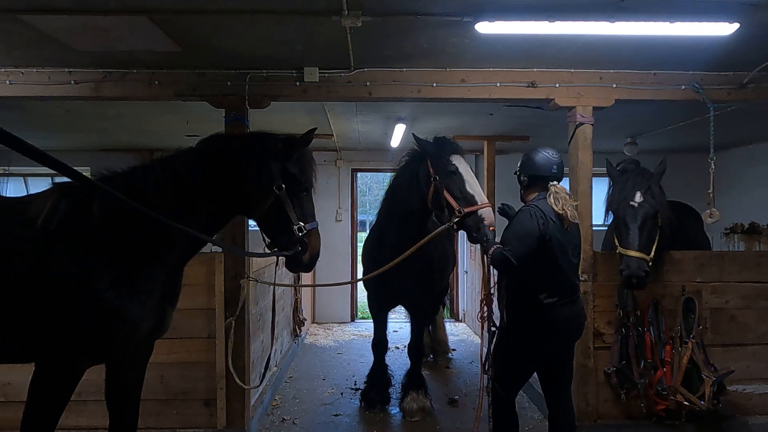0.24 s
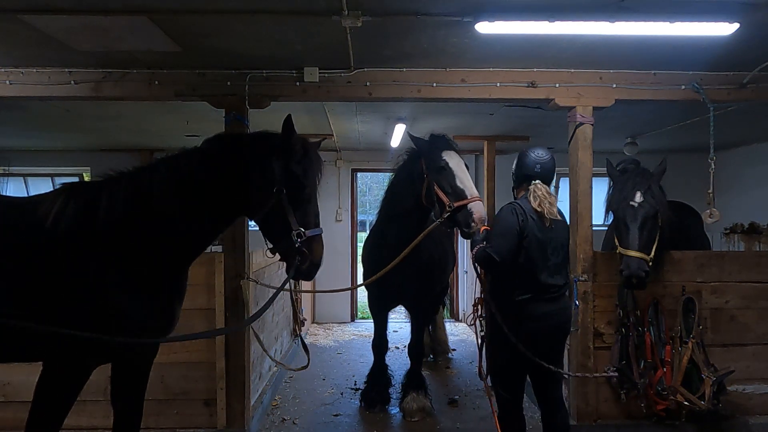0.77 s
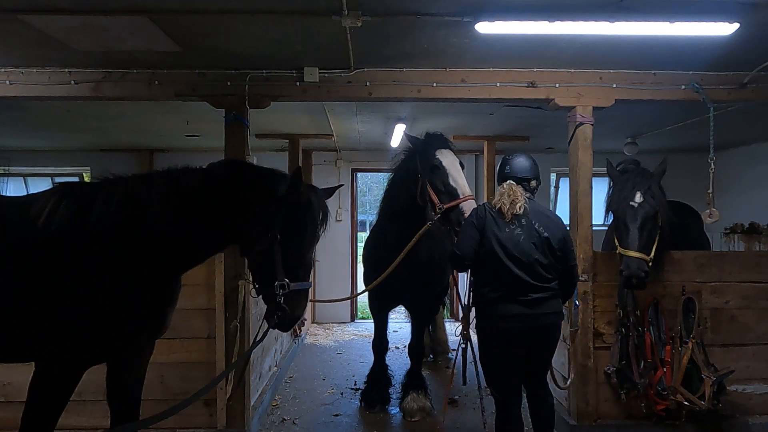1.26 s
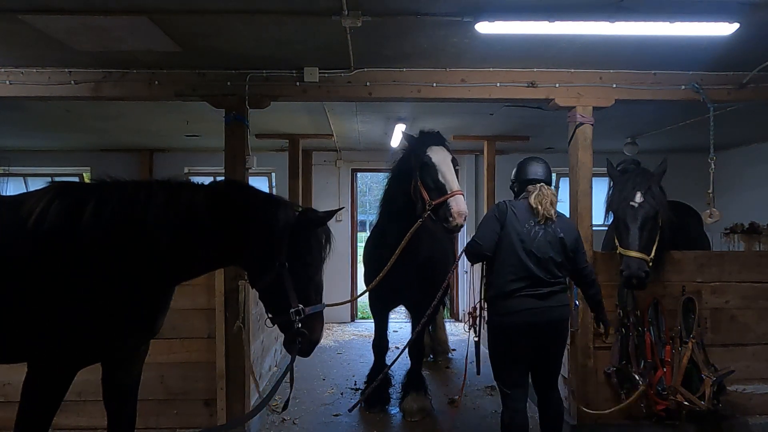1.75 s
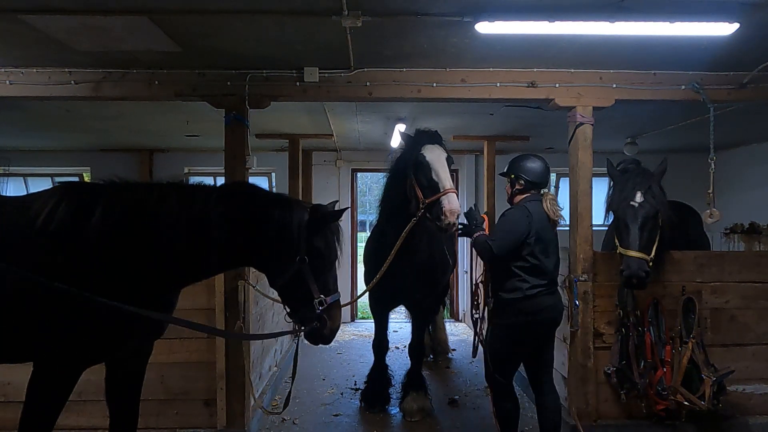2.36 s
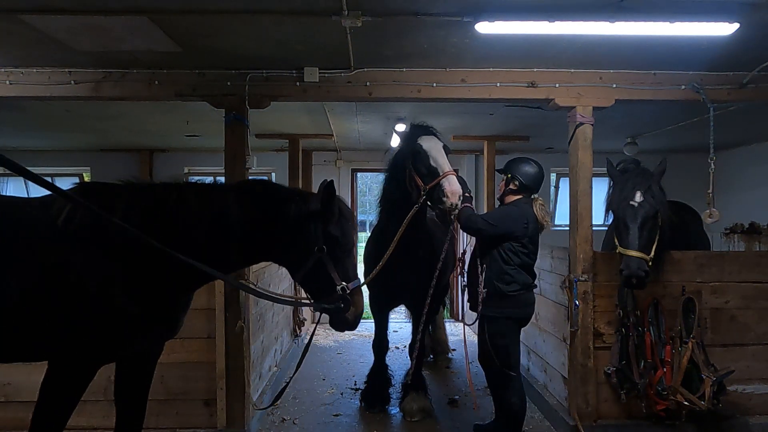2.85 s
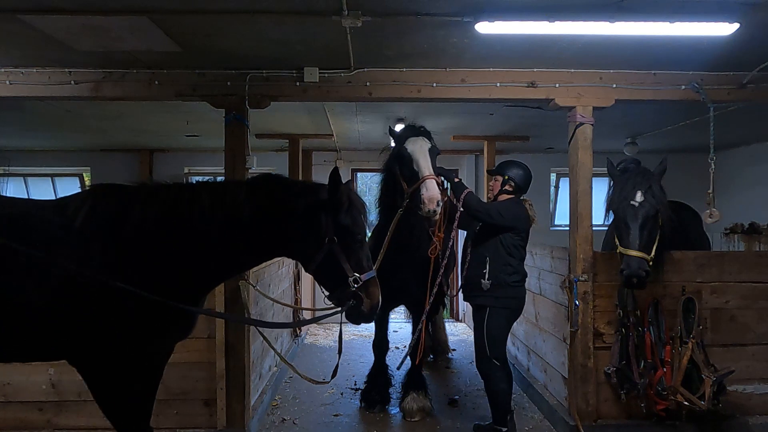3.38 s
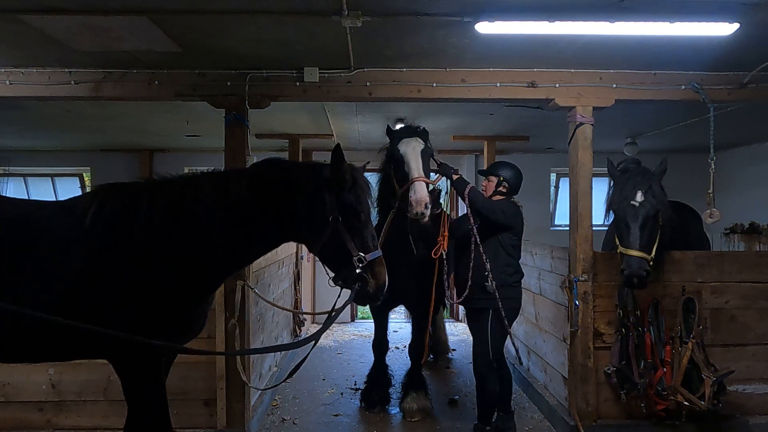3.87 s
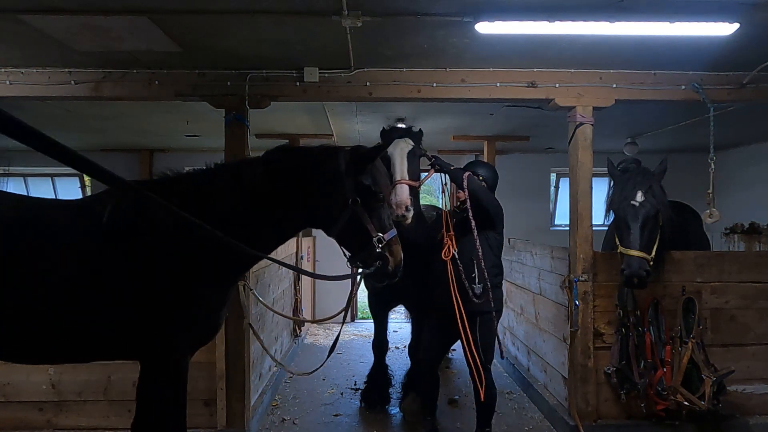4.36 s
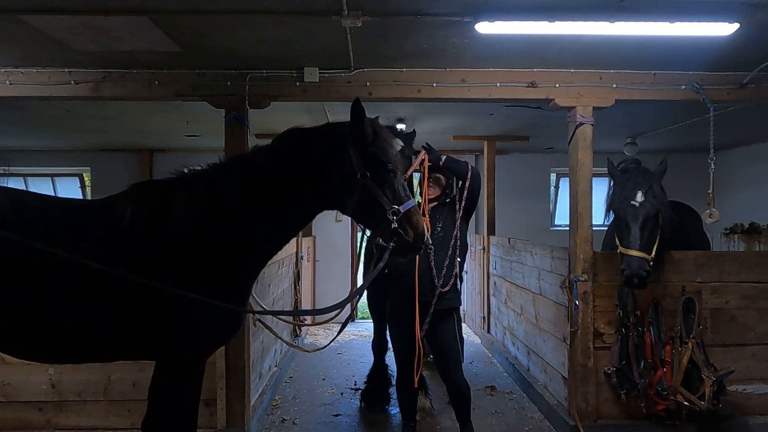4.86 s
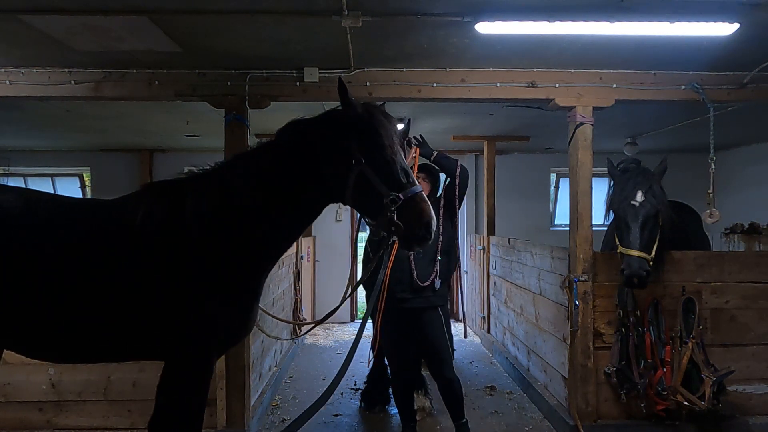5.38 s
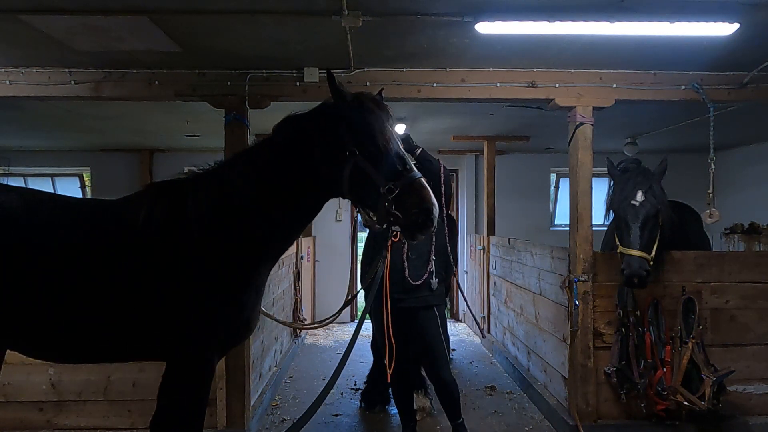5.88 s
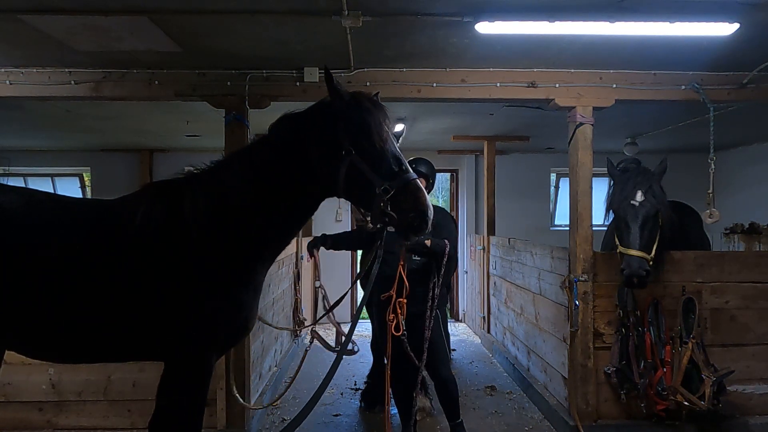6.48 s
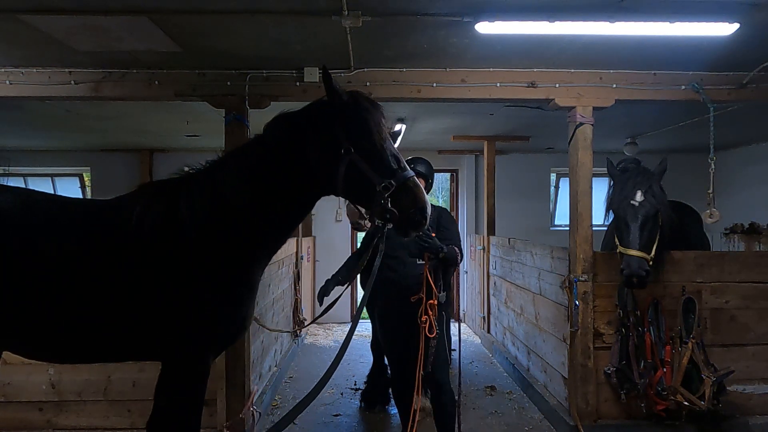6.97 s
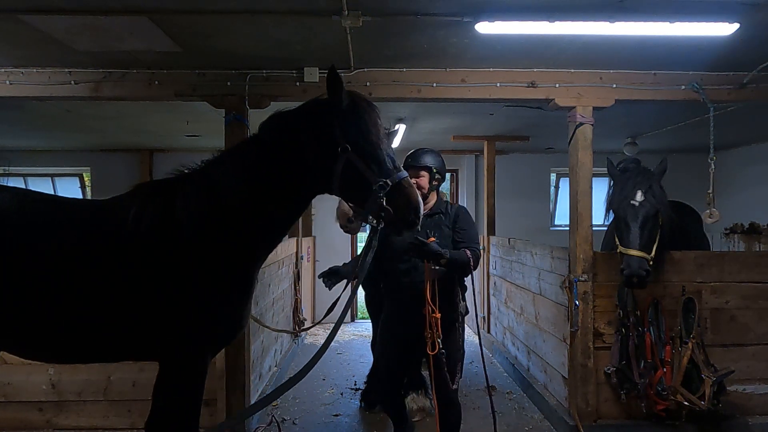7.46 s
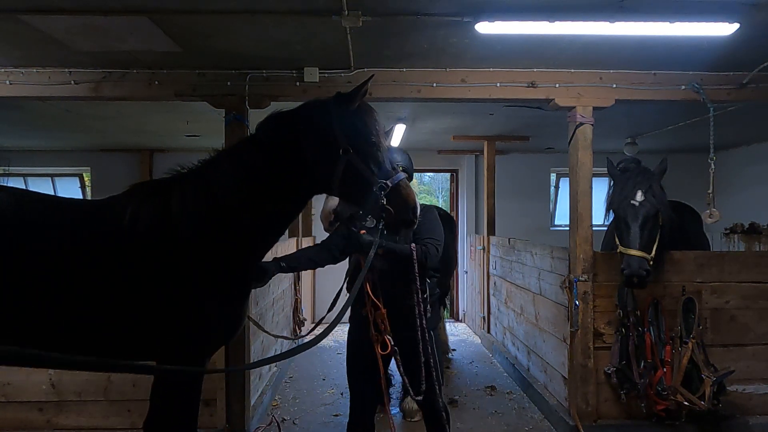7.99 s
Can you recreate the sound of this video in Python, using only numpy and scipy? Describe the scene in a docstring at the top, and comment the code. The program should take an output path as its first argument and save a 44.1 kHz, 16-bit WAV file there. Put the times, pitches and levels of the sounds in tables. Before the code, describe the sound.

Leather and rope rub softly while hooves make low thuds and short woody knocks, answered by a brief low-room echo. Grit and buckles tick brightly between them. Loose metal cracks on wood around two seconds, a cluster of hoof steps follows near four, and after a quieter stretch the loudest knock and a metallic rattle land just past seven seconds. Close-to-mid stereo perspective, with a quiet airy background.

```python
"""A timber stable aisle, where horses shift about a few metres away.
Hooves thud and knock as sums of decaying modes; ropes, straps and dragged hooves rustle as shaped noise.
Buckles and grit tick in short noise bursts, metal rings on paired modes or chatters on wood.
Faint fuzzy tones, some creak-like and some ringing on after a knock, are sines of wandering pitch and level.
Sparse decaying echoes of the low room answer every blow."""
import sys
import numpy as np
from scipy import signal
from scipy.fft import rfft, irfft, next_fast_len
from scipy.io import wavfile
from scipy.ndimage import uniform_filter1d

SR = 44100
rng = np.random.default_rng(int(sys.argv[2]) if len(sys.argv) > 2 else 0)


def int16_out(signal):
    """Quantize to a 16-bit WAV file."""
    q = np.round(np.clip(np.atleast_2d(signal).T, -1, 1) * 32767)
    wavfile.write(sys.argv[1], SR, q.astype(np.int16))


N = 362943

# Likeness of the left and right sound fields. Each row: frequency in Hz, correlation from 0 to 1.
LIKENESS = [(60, 1), (200, 0.9255), (700, 0.733), (3000, 0.726), (12000, 0.83)]


def amp(db):
    """Decibels are logarithmic: 20 dB is a tenfold gain."""
    return 10 ** (np.asarray(db) / 20)


def evened(x):
    """Root-mean-square normalization: scales a signal to unit rms."""
    return x / np.sqrt(np.mean(x ** 2) + 1e-20)


def read(points, hz):
    """Linear interpolation of a table along a logarithmic frequency axis."""
    f, value = np.transpose(points)
    return np.interp(np.log(hz + 1), np.log(f + 1), value)


def add(mix, s, sound, pan_db=0.):
    """Superposition: adds a sound at s seconds, with a level difference of pan_db toward the left."""
    part = mix[:, round(s * SR):][:, :len(sound)]
    side_gain = amp([[pan_db / 2], [-pan_db / 2]])
    part += side_gain * sound[:part.shape[1]]


def grid(size):
    """Short-time analysis: times and frequencies of frames that overlap by three quarters."""
    t = np.arange(N * 4 // size + 5) * size / 4 / SR
    return t, np.fft.rfftfreq(size, 1 / SR)


def correlated(left, other, hz):
    """Partial coherence: the right channel mixes the left with an independent spectrum."""
    same = np.clip(read(LIKENESS, hz), -1, 1)[:, None]
    return np.array([left, same * left + np.sqrt(1 - same ** 2) * other])


def noise(db, size, patchy_db):
    """Filtered Gaussian noise: a level field over frequency and time, with drifting patches."""
    hz = np.fft.rfftfreq(size, 1 / SR)
    a, b, c, d, patches = rng.standard_normal((db.shape[1], len(hz), 5)).T
    patches = uniform_filter1d(patches, size=6, axis=0)  # smooth over frequency, then over time
    patches = evened(uniform_filter1d(patches, size=10240 // size, axis=1))
    z = correlated(a + 1j * b, c + 1j * d, hz)
    z = z * amp(db + patchy_db * patches)
    return signal.istft(z, nperseg=size, noverlap=size * 3 // 4)[1][:, :N]


def struck(modes, rise_s, rough=0., grip_s=0.005):
    """Modal synthesis: a blow excites damped sines, shaken by loose contact, scaled to peak 1."""
    hz, db, t60 = np.transpose(modes)[:, :, None]
    t = np.arange(0, t60.max(), 1 / SR)
    luck = rng.standard_normal((2, len(hz), 1))  # mode levels and phases differ from blow to blow
    decay = np.exp(-np.log(1000) * t / t60)
    rings = decay * np.sin(2 * np.pi * (hz * t + luck[1]))
    shake = rng.standard_normal((len(hz), len(t)))
    shake = uniform_filter1d(shake, int(grip_s * SR) + 1, axis=1)
    rings = rings * (1 + rough * evened(shake))
    rise = 1 - np.exp(-(t / rise_s) ** 2)
    ring = (amp(db + 2 * luck[0]) * rings).sum(0) * rise
    return ring / abs(ring).max()


def planks(low_hz, high_hz, t60, tilt_db, count):
    """Modal density: timber has many close, short modes, tilted by tilt_db an octave, weak at the top."""
    return [(f, tilt_db * np.log2(f / low_hz) - 12 * (f / high_hz) ** 4, t60)
            for f in np.geomspace(low_hz, high_hz, count)]


def burst(colour, rise_s, t60, grain_db):
    """Transient noise: coloured hiss in uneven grains under a quick rise and exponential decay."""
    t60 = min(t60, .45)
    size = 400 * int(t60 * SR / 400 + 4)
    t, hz = np.arange(size) / SR, np.fft.rfftfreq(size, 1 / SR)
    white = rng.standard_normal(SR // 2)[:size]
    hiss = irfft(rfft(white) * amp(read(colour, hz)))
    grains = np.repeat(amp(grain_db * rng.standard_normal(SR // 100)), 50)[:size]
    shape = amp(-60 * t / t60) * np.minimum(t / rise_s, 1) ** 2
    grainy = uniform_filter1d(grains, size=30) * hiss * shape
    return evened(grainy) * np.sqrt(np.mean(shape ** 2))


def air():
    """Stationary noise: a steady room tone of fixed average spectrum."""
    # Each row: frequency in Hz, relative spectral level in dB.
    air_colour = [(24, 5), (60, 9.5), (100, -49), (139, 7.5), (174, 1.5), (838, -17), (1350, 0.5),
                  (4920, -6.5), (11800, -53), (15500, -83.5)]
    t, hz = grid(size=2048)
    field = read(air_colour, hz)[:, None] + 0 * t
    return amp(-56) * evened(noise(field, size=2048, patchy_db=5.0))


def strokes(t):
    """Energy addition: strokes swell and fade at constant dB rates, and their powers sum."""
    # Sliding ropes and straps, dragging hooves. Each row: crest in seconds, rustle level in dB,
    # low shuffle level in dB, swell in seconds, fade in seconds (each time spans drop_at_ends_db).
    stroke_rows = [(0.068, -35, -43, 0.296, 0.141), (.62, -47, -44.5, 0.071, 0.176),
                   (.97, -77, -52, 0.62, 0.72), (1.299, -40.5, -55, 0.384, 0.152),
                   (1.46, -47, -40, 0.097, 0.17), (1.62, -45, -46, 0.14, 0.392),
                   (2.45, -46, -41, 0.283, 0.443), (2.7, -48, -63.5, 0.712, 0.39),
                   (2.98, -39.5, -43, 0.026, 0.225), (3.471, -39.5, -49.5, 0.18, 0.276),
                   (3.931, -36.5, -34, 0.0966, 0.1596), (4.2, -49.5, -49.5, 0.27, 0.28),
                   (4.4, -39.5, -48, 0.171, 0.0425), (4.63, -44, -48, 0.205, 0.54),
                   (4.96, -31.5, -43.5, 0.1134, 0.2098), (5.7, -46, -47.5, 0.244, 1),
                   (6.1, -41.5, -73.5, 0.184, 0.29), (6.62, -46, -44.5, 0.284, 0.42),
                   (7.05, -39.5, -43.5, 0.189, 0.57), (7.45, -66, -37.5, 0.505, 0.1025),
                   (7.9, -48, -56.5, 0.36, 0.082)]
    drop_at_ends_db = 15
    s, level_db, low_db, swell_s, fade_s = np.transpose(stroke_rows)[:, :, None]
    drop_db = drop_at_ends_db * np.maximum((s - t) / swell_s, (t - s) / fade_s)
    levels = []
    for db, stir_db in ((level_db, -58), (low_db, -79.5)):  # faint stirring between the strokes
        power = amp(2 * stir_db) + amp(2 * (db - drop_db)).sum(0)
        levels.append(10 * np.log10(power))
    return levels


def rustle():
    """Friction noise: fibres slip in clumps, heavier dragging is duller, weight shifts shuffle low."""
    # Colours of the rubbing fibres and of the shuffle.
    # Each row: frequency in Hz, relative spectral level in dB.
    fibre_colour = [(290, -36.5), (500, -29.5), (1150, 0.5), (2500, -2.5), (3430, -3), (5280, -6.5),
                    (12100, -32.5), (14800, -45.5)]
    shuffle_colour = [(35, -37), (112, -51), (139, -3.5), (193, 3.5), (368, -6), (451, -7), (900, -19),
                      (1170, -51.5), (1980, -120)]
    dull_hz, dull_per_db, dull_from_db = 3475, .5, -38  # treble loss per octave and dB of stroke level
    rasp_hz, rasp_octaves = 2845, 0.13  # a resonance that grows with the stroke
    rasp_per_db, rasp_from_db = 0.16, -49
    t, hz = grid(size=512)
    level_db, low_db = strokes(t)
    slips_db = 1.42 * np.minimum(rng.exponential(1, len(t)), 4)
    treble = np.clip(np.log2(hz / dull_hz + 1e-9), 0, 1.2)[:, None]  # octaves above dull_hz
    fibres = read(fibre_colour, hz)[:, None] - treble * dull_per_db * (level_db - dull_from_db)
    rasp = np.exp(-(np.log2(hz / rasp_hz + 1e-9) / rasp_octaves) ** 2)[:, None]
    fibres = fibres + rasp * rasp_per_db * (level_db - rasp_from_db)
    fibres = fibres - 10 * np.log10(amp(2 * fibres).sum(0))  # equal power in every frame
    rub = evened(noise(fibres + slips_db, size=512, patchy_db=2.0))
    frames, hz = grid(size=2048)
    shuffle_field = read(shuffle_colour, hz)[:, None] + 0 * frames
    weight = evened(noise(shuffle_field, size=2048, patchy_db=5.0))
    now = np.arange(N) / SR
    return amp(np.interp(now, t, level_db)) * rub + amp(np.interp(now, t, low_db)) * weight


def hooves():
    """Modal excitation: each blow shares its force between slow boom, body and quick floor knock."""
    # Hooves and dropped tack. Each row: start in seconds, boom, body and knock peak levels in dB,
    # boom frequency of that spot in Hz, knock tilt in dB per octave.
    thud_rows = [(0.036, -81.5, -50, -29, 85, 2.5), (0.574, -84, -64.5, -37, 87, 4),
                 (1.433, -43.5, -39, -23, 80.4, 3), (1.607, -47, -35, -25.5, 87.2, -4),
                 (1.675, -48, -33.5, -40, 71.1, -2), (2.148, -23, -23.5, -50, 75.67, 4),
                 (2.424, -75, -43.5, -35.5, 89.7, -4), (2.459, -77, -30, -35.5, 91, -7),
                 (2.6, -33.5, -62.5, -32.5, 74.9, 8.5), (2.947, -81, -35.5, -40, 67, 5.5),
                 (3.843, -37, -31, -56, 87.5, -0.5), (3.915, -30, -25.5, -32, 79.5, 4),
                 (4.32, -27, -26.5, -25.5, 78.17, 1.5), (4.347, -25, -21, -17, 82, 2),
                 (4.658, -46, -24.5, -29, 94.9, 0), (5.0, -75.5, -51.5, -32, 80, -2),
                 (6.624, -37.5, -56.5, -67, 93.9, -2.5), (6.698, -43.5, -37, -41.5, 88.7, -0.5),
                 (7.033, -60, -29.5, -20.5, 70, -1.5), (7.054, -28.5, -19, -4.5, 70.9, -1),
                 (7.151, -21, -18.5, -35, 68.96, -7.5), (7.24, -24, -26, -41, 68.7, -2.5),
                 (7.954, -62.5, -38.5, -35.5, 67, 1), (8.048, -81, -36.5, -38, 67.9, 0.5)]
    # Hoof wall and boards ringing on after a knock.
    # Each row: mean frequency in Hz, relative level in dB, 60 dB decay time in seconds.
    hoof_modes = [(390, 4, .18), (630, 6, .13), (770, 0, .1), (940, 0, .1), (1130, 0, .13), (1260, -2, .16),
                  (1440, 1, .1), (1760, -4, .1)]
    pair = 1.18  # frequency ratio of neighbouring boom modes
    out, body = np.zeros((2, N)), planks(120.16, 452.37, 0.18, -0.18, count=16)
    knock = planks(380, 2700, 0.08, -2, count=30) + hoof_modes
    for s, boom_db, body_db, knock_db, boom_hz, tilt_db in thud_rows:
        boom = [(boom_hz, 0, .22), (boom_hz * pair, -2, .2), (boom_hz * pair ** 2, -5, .2)]
        add(out, s, amp(boom_db) * struck(boom, rise_s=0.0335, rough=.25, grip_s=0.049))
        add(out, s, amp(body_db) * struck(body, rise_s=0.00516, rough=0.299, grip_s=0.033))
        tilted = [(hz * rng.normal(1, .03), db + tilt_db * np.log2(hz), t60) for hz, db, t60 in knock]
        add(out, s, amp(knock_db) * struck(tilted, rise_s=0.004, rough=.7, grip_s=.012))
    return out


def ticks():
    """Impulsive noise: grit, buckles and strap ends tick, each with its own brightness and side."""
    # Each row: start in seconds, level in dB around 1-3 kHz, relative level in dB around 3-7 kHz.
    tick_rows = [(0.053, -25.5, -13), (.11, -26, -23), (1.281, -40, -1), (1.433, -36.5, 1),
                 (1.603, -33.5, -1.5), (1.665, -24, -3), (1.8285, -33.5, -7), (2.609, -27, -11.5),
                 (3.0591, -40.5, 0.5), (3.466, -34, -4), (3.499, -35, -5), (3.9682, -23, 2),
                 (4.3228, -42, 6.5), (4.347, -29, -2), (4.641, -29, -6.5), (4.8387, -30, 1),
                 (4.961, -21, -9), (4.967, -18.5, -11), (5.0112, -14, -8), (5.093, -26, -23.5),
                 (5.6925, -37.5, -10), (5.87, -40.5, 2), (6.342, -33, -2.5), (6.4252, -37.5, 2),
                 (6.6962, -30, 0.5), (6.9609, -30, -5.5), (7.018, -25, -3), (7.117, -19, -13),
                 (7.933, -32.5, -9), (7.9832, -37.5, -5), (8.0566, -34, -10.5), (8.205, -32, -7.5)]
    out = np.zeros((2, N))
    for s, low_db, mid_db in tick_rows:
        high_db = -6 + 1.7 * mid_db  # above 7 kHz the level follows the brightness
        colour = [(500, -35.5), (1100, -0.5), (1900, -1.0), (3000, -1.5), (4500, mid_db + 1.5),
                  (6500, mid_db - 4.5), (9500, high_db - 8.5), (15000, high_db - 17)]
        total_db = 10 * np.log10(1 + amp(2 * mid_db) + amp(2 * high_db))  # band powers add
        tick = burst(colour, rise_s=0.00198, t60=0.03755, grain_db=4.0)
        add(out, s, amp(low_db + total_db) * tick, pan_db=1.33 + 1.5 * rng.standard_normal())
    return out


def clinks():
    """Beating mode pairs: a thin ring clinks and a heavy snap hook rattles down."""
    # Modes of the thin ring and of the snap hook.
    # Each row: frequency in Hz, relative level in dB, 60 dB decay time in seconds.
    ring_modes = [(4980, -1, 0.2), (6214, 3, 0.45), (8003, 0.5, 0.291), (9570, -8, 0.1), (10510, -2, 0.25),
                  (12100, -13.5, 0.14), (13010, -15.5, 0.27), (14600, -17, 0.16)]
    snap_modes = [(4939, 13, 0.06), (5130, 11, 0.05), (4968, -2, 0.36), (5166, 11, 0.06), (7750, -4, 0.047),
                  (8356, -2, 0.04), (9060, 1.5, 0.0603), (13330, -20.5, 0.16)]
    # Blows on each. Each row: start in seconds, level in dB before the jangle.
    ring_blows = [(1.072, -31), (1.108, -22), (6.343, -41.5)]
    snap_blows = [(7.152, -20), (7.162, -7), (7.168, -4), (7.194, -12)]
    out = np.zeros((2, N))
    for modes, blows, rough in ((ring_modes, ring_blows, .3), (snap_modes, snap_blows, .65)):
        paired = modes + [(hz * 1.008, db, t60) for hz, db, t60 in modes]  # close twins beat
        for s, db in blows:
            ring = struck(paired, rise_s=0.0003, rough=rough)
            jangle = rng.standard_normal(SR)[:len(ring)]
            jangle = evened(uniform_filter1d(jangle, size=300))  # loose parts touch and damp it
            add(out, s, amp(db + 2.8 * jangle) * ring, pan_db=2.0)
    return out


def chatter():
    """Resonant filtering: loose fittings crack and chatter on wood as noise through broad resonances."""
    # Colour of the fittings on wood. Each row: frequency in Hz, relative spectral level in dB.
    latch_colour = [(240, -19.5), (450, -13.5), (860, -17), (1100, -12.5), (2500, -10), (5000, -10),
                    (8900, -13.5), (13900, -20.5), (15500, -47)]
    # Their resonances. Each row: frequency in Hz, width in Hz, boost in dB at full share.
    latch_rings = [(2200, 1600, -9), (3570, 300, 13), (4350, 300, 11), (6150, 600, 13), (12000, 6000, -4)]
    # Each row: start in seconds, level in dB before the envelope, rise in seconds,
    # 60 dB decay time in seconds (capped in burst), share of the resonances from 0 to 1.
    chatter_rows = [(1.057, -17, 0.0216, 0.115, 0.27), (1.108, -29.5, 0.0052, 0.134, 0.81),
                    (2.146, -1.5, 0.00333, 0.0223, 0.8), (2.152, -19.5, 0.0247, 1, 0.64),
                    (2.199, -23, 0.0053, 0.44, 0.93), (2.947, -41.5, 0.0045, 0.448, 0.93),
                    (7.034, -19, 0.0257, 0.0795, 0.56), (7.0958, -11, 0.000525, 0.0242, 0.31),
                    (7.098, -26, 0.00264, 0.116, 0.2), (7.149, -14.5, 0.00547, 0.23, 0.28)]
    out = np.zeros((2, N))
    hz = np.geomspace(200, 16000, 300)
    rings_db = sum(db / (1 + (2 * (hz - f) / width) ** 2) for f, width, db in latch_rings)
    for s, db, rise_s, t60, share in chatter_rows:
        colour = np.transpose([hz, read(latch_colour, hz) + share * rings_db])
        add(out, s, amp(db) * burst(colour, rise_s, t60, grain_db=4.2), pan_db=1.5)
    return out


def faint_tones():
    """Random modulation: wandering level and pitch smear each tone, which crests early and dies away."""
    # Faint fuzzy tones, some creak-like, some ringing on after a knock. Each row: start in seconds,
    # length in seconds, mean frequency in Hz, crest level in dB before the level wanders.
    tone_rows = [(1.66, 0.2, 1805, -44), (3.195, 0.185, 1909, -50.5), (3.767, 0.4, 1810, -51.5),
                 (5.187, 0.24, 1890, -54.5), (5.8, 0.415, 3536, -49.5), (4.4, 0.199, 1301, -43),
                 (6.08, 0.144, 1466, -50.5)]
    out = np.zeros((2, N))
    for s, length_s, hz, db in tone_rows:
        t = np.arange(0, length_s, 1 / SR)
        level_wander, pitch_wander = (
            evened(uniform_filter1d(rng.standard_normal(SR)[:len(t)], size=size)) for size in (250, 900))
        turns = np.cumsum(hz * (1 + .012 * pitch_wander)) / SR
        swell = np.sin(np.pi * np.sqrt(t / length_s)) ** 2
        add(out, s, amp(db) * (1 + .6 * level_wander) * np.sin(2 * np.pi * turns) * swell)
    return out


def room(x):
    """Reverberation: sparse taps of random sign, each band decaying at its own rate, bass alike in both."""
    # Each row: frequency in Hz, 60 dB decay time in seconds.
    reverb_times = [(60, 0.359), (250, 0.681), (1000, 0.662), (3000, 0.3555), (7000, 0.293), (13000, 0.217)]
    taps = np.zeros((2, SR))
    at = np.arange(320, SR - 20, 20) + rng.integers(0, 20, (2, (SR - 321) // 20))
    np.put_along_axis(taps, at, rng.choice([-1., 1.], at.shape), 1)
    hz, t, z = signal.stft(taps, SR, nperseg=1024)
    z = correlated(z[0], z[1], hz)
    decay = amp(-60 * t / read(reverb_times, hz)[:, None])
    tail = signal.istft(z * decay, SR, nperseg=1024)[1][:, 160:]  # shortens the initial gap
    return signal.fftconvolve(x, tail / np.linalg.norm(tail[0]), axes=1)[:, :N]


def scene():
    """Superposition: direct blows, their reverberation, and the rubbing, faint tones and air around them."""
    floor, small, metal = hooves(), ticks(), clinks() + chatter()
    wet = amp(-6) * floor + amp(-4) * small + metal
    return floor + small + metal + room(wet) + rustle() + faint_tones() + air()


def record(dry):
    """Linear-phase delay of the left channel, then low cut, clipping at full scale and band limit."""
    size = next_fast_len(N)
    delay = np.exp(-2j * np.pi * .7 * np.fft.rfftfreq(size))  # 0.7 sample
    late = irfft(rfft(dry[0], size) * delay, size)[:N]
    low_cut = signal.butter(2, 50, "high", fs=SR, output="sos")
    cut = signal.sosfilt(low_cut, np.array([late, dry[1]]))
    taps = signal.firwin(511, 15600, window=("kaiser", 9), fs=SR)  # passes below 15.6 kHz
    return signal.oaconvolve(np.clip(cut, -1, 1), taps[None], "same")


dry = scene()
out = record(dry)
int16_out(out)
```